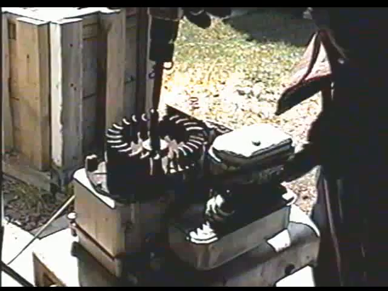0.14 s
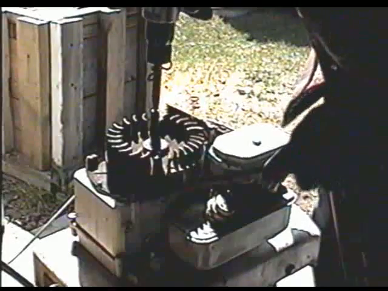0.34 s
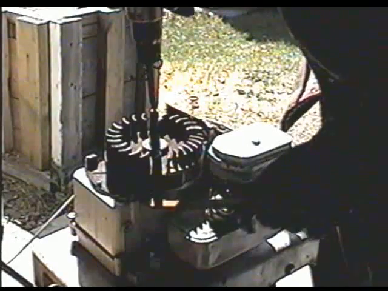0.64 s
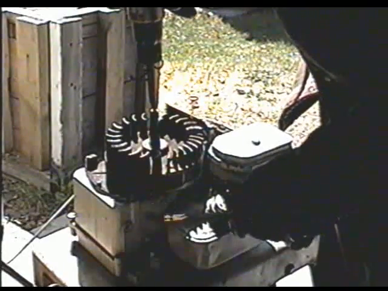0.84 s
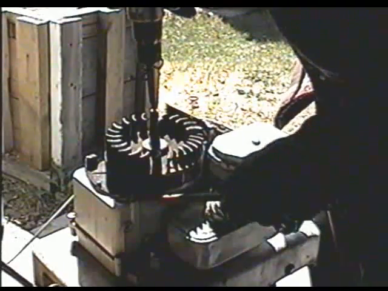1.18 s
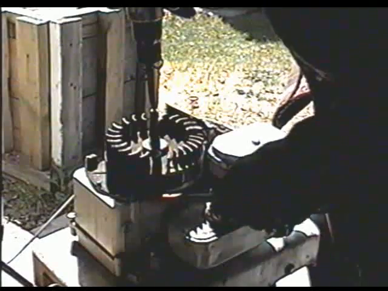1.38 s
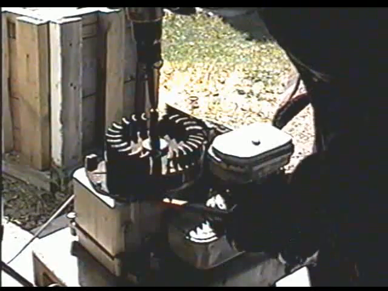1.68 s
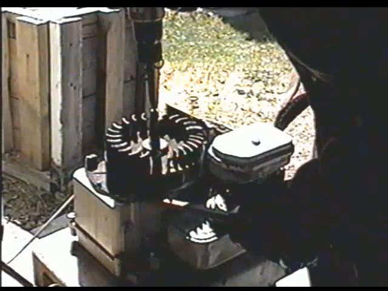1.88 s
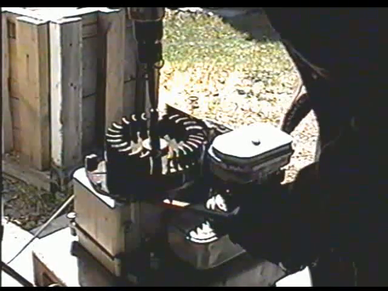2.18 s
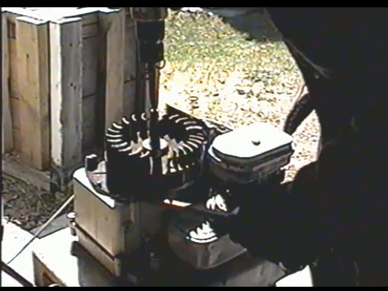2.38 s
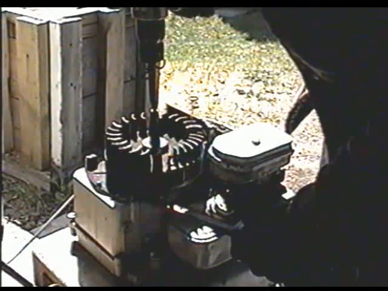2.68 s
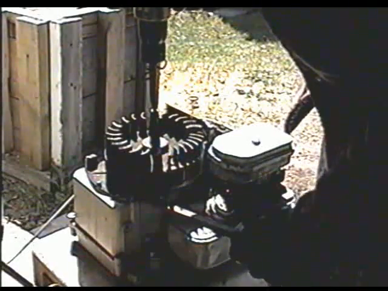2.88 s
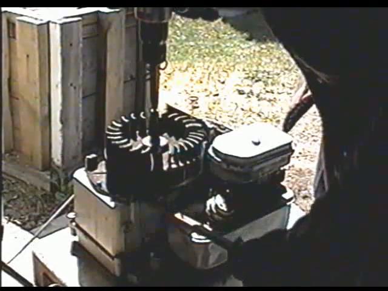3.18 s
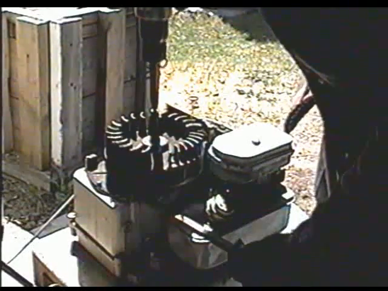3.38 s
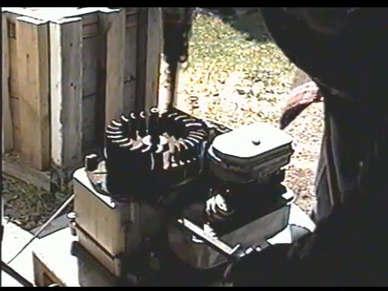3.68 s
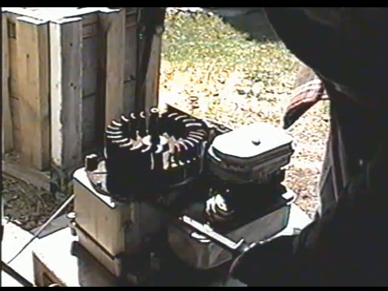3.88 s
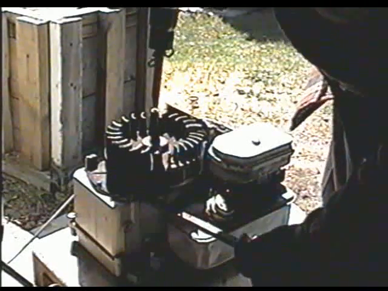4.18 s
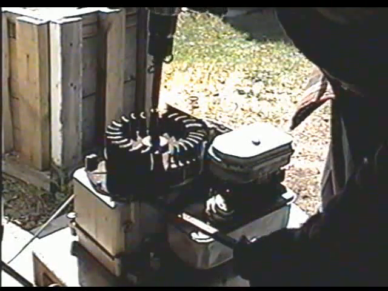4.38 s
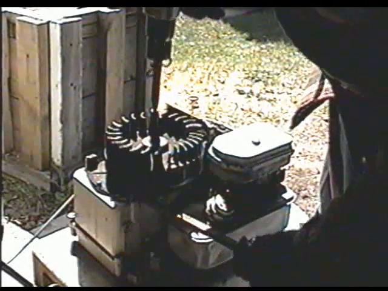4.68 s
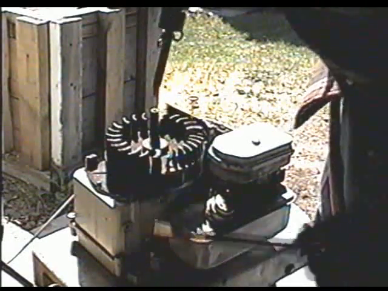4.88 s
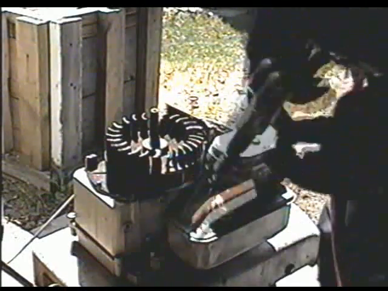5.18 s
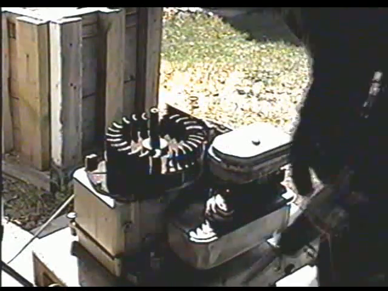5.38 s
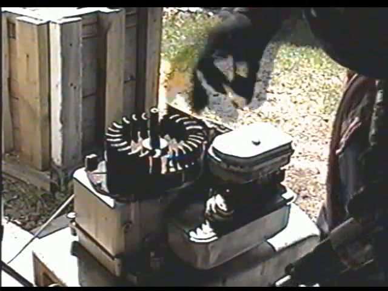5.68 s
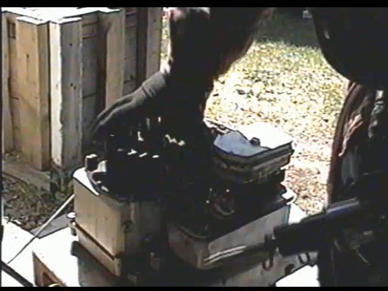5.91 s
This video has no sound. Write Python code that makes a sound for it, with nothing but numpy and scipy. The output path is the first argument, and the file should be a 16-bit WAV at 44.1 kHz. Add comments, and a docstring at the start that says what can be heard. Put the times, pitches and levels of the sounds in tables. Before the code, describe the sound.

A close camcorder microphone in a small yard picks up hiss, hum and motor whirr. A dull crate knock comes first, then pry bar clicks and one sharp snap. An air hammer fires three very short, fast metallic bursts with puffs of air. The whirr ducks under each burst and swells back. Light clinks of chisel, shaft and cover follow, with a short outdoor echo.

```python
"""In a yard, an air hammer fires three short bursts into a flywheel shaft; a pry bar, the chisel and a crate click around them.
Blows and knocks are short pushes of noise that ring each thing's own tones; the hammer's air is shaped noise.
A short noise tail gives the echo of the yard. A tape camcorder adds steady hiss, wavering hum, a low drone
and the whirr of its motor, which sinks under each burst and swells in the pauses; the sound drops out twice."""
import sys
import numpy as np
from scipy import signal
from scipy.fft import rfft, irfft
from scipy.io import wavfile
from scipy.ndimage import uniform_filter1d

SR = 44100
rng = np.random.default_rng(int(sys.argv[2]) if len(sys.argv) > 2 else 0)


def dump(signal):
    """Clip the signal to [-1, 1] and save it as 16-bit WAV at the path in sys.argv[1]."""
    limited = np.clip(np.atleast_2d(signal).T, -1, 1)
    pcm = np.round(limited * 32767).astype(np.int16)
    wavfile.write(sys.argv[1], SR, pcm)


def invert_db(level):
    """Linear amplitude ratio for a level in decibels (20 dB per decade), elementwise."""
    return 10 ** (np.asarray(level, dtype=float) / 20)


N = 266805
T = np.arange(N) / SR  # time of each sample [s]

# In every table of modes or colour the levels are relative: they set the balance, not the final loudness.
# steady firing: (first blow [s], trigger off [s], first rate [Hz], last rate [Hz],
#                 typical peak [dB], thump against peak [dB])
HAMMER_RUNS = [(2.4819, 2.589, 67.1, 75.7, -15.5, -8), (3.0613, 3.183, 70.77, 69, -15.5, -6),
               (3.4545, 3.49, 69.5, 68.5, -14.5, -8)]
# single blows as the piston starts, stumbles and coasts:
# (time [s], peak [dB], rattle of the steel [ms], thump against peak [dB])
SINGLE_BLOWS = [(2.4385, -14.5, 3, 4), (2.4643, -14.5, 4.5, -11.5), (3.047, -15, 2.1, -1),
                (3.2061, -25, 5, -5), (3.4393, -17, 7.4, -2.5), (3.497, -24, 9.6, 1),
                (3.5171, -21.5, 2.8, -4.5), (3.531, -20.5, 4.5, -1.5), (3.5492, -26, 3.6, 5),
                (3.5625, -19.5, 1.9, -2.5), (3.5775, -27.5, 2.9, 4), (3.6017, -30, 2.7, 3)]
# ringing tones of chisel and shaft: (pitch [Hz], width before damping [Hz], level [dB])
STEEL_MODES = [(2200, 61, -4), (2820, 52, -9), (3150, 38, -11), (3400, 9, -1), (3480, 50, 3), (3820, 60, 1),
               (4020, 130, 6.5), (6190, 88, 1), (6830, 82, -5), (7370, 150, 2), (8040, 80, -12),
               (8420, 110, 4), (8910, 63, -2), (9800, 190, -7.5)]
# broad sound of chisel and shaft: (frequency [Hz], level per Hz [dB])
STEEL_BODY = [(590, -44), (1000, 2.5), (1080, 2.5), (1790, 2.5), (2090, -4), (2440, -3), (4000, 2.5),
              (5620, -6), (6130, -4), (9210, -13), (13800, -11)]
# ringing tones of the engine block on its stand: (pitch [Hz], width before damping [Hz], level [dB])
BLOCK_MODES = [(279, 52, 3), (484, 20, -5), (849, 24, -0.5), (1094, 12, 2), (1422, 54, 0), (1720, 37, -22)]
# broad sound of the engine block: (frequency [Hz], level per Hz [dB])
BLOCK_BODY = [(29, -44), (50, -16), (173, -13.5), (274, -11), (486, -9), (564, -6.5), (835, -6.5),
              (1200, -16), (2500, -19), (3250, -11), (5500, -120)]
# exhaust air, one row a pull of the trigger:
# (open [s], shut [s], level at opening [dB], level at shutting [dB])
AIR_PULLS = [(2.417, 2.585, -42.5, -34.5), (3.035, 3.185, -30, -33.5), (3.4275, 3.575, -32.5, -40)]
# colour of the exhaust air: (frequency [Hz], level per Hz [dB])
AIR_COLOUR = [(1500, -7), (2500, -2), (3500, -1.5), (5200, -13), (7500, -4.5), (9500, -9.5), (12000, -20),
              (14000, -35)]
# whistle of the closing valve: (start [s], end [s], middle pitch [Hz], full level [dB])
VALVE_WHISTLE = (3.622, 3.684, 10050, -45.5)

# Knocks: each thing has a table of hits, then a pair of tables for its tones and its broad body.
# pry bar hits: (time [s], peak [dB], rattle [ms], tilt per octave [dB])
BAR_HITS = [(1.171, -24.5, 3.3, -1), (1.176, -24, 2.8, -2.5), (1.184, -32.5, 12, -7),
            (1.2423, -27.5, 10, -5.5), (1.6, -26.5, 11.6, -5)]
# pry bar: tones (pitch [Hz], width before damping [Hz], level [dB]); body (frequency [Hz], level per Hz [dB])
BAR = ([(450, 44, -20.5), (1120, 76, -34), (1880, 23, -44), (2150, 14, 2), (2910, 30, -22),
        (4200, 35, -17)], [(120, -48), (200, -29), (829, -22), (1170, -5), (1790, -21), (2160, -7),
        (2480, -12), (12000, -55), (15600, -78), (22000, -120)])
# sharp snaps: (time [s], peak [dB], rattle [ms], tilt per octave [dB])
SNAP_HITS = [(1.2565, -13, 4.9, -2.3), (1.263, -21.5, 5.3, -5), (3.6432, -29, 11.3, 9.5)]
# snap: tones (pitch [Hz], width before damping [Hz], level [dB]); body (frequency [Hz], level per Hz [dB])
SNAP = ([(2070, 45, -6.5), (2220, 45, -5), (2880, 23, -5), (4020, 40, 2), (5020, 50, -5), (5200, 27, -13),
         (6140, 100, -46), (7200, 50, -5), (6960, 19, -26)], [(120, -55), (200, -31), (1660, -27),
         (2150, -7.5), (2470, -15), (3960, -8), (4720, -9), (7310, -17), (13000, -86)])
# crate hits: (time [s], peak [dB], rattle [ms], tilt per octave [dB])
CRATE_HITS = [(.558, -30.5, 1.9, .1), (.563, -27, 1.7, -.1)]
# crate: tones (pitch [Hz], width before damping [Hz], level [dB]); body (frequency [Hz], level per Hz [dB])
CRATE = ([(196, 27, 4), (417, 24, 2), (1140, 60, -8), (1430, 90, -19), (1910, 75, -14), (3420, 80, -20),
         (4050, 100, -23)], [(59, -39), (150, 2), (368, 9), (886, -21), (1910, 0.5), (2340, -26),
         (3440, -13), (8000, -37), (10400, -65), (17600, -120)])
# flywheel hits: (time [s], peak [dB], rattle [ms], tilt per octave [dB])
FLYWHEEL_HITS = [(4.6437, -26, 5, 3.5), (4.648, -22, 11, -1.1), (4.663, -29.5, 9, -8)]
# flywheel: tones (pitch [Hz], width before damping [Hz], level [dB]); body (frequency [Hz], level per Hz [dB])
FLYWHEEL = ([(422, 18, -5), (689, 27, -22), (870, 33, -20), (2200, 86, -16), (2900, 37, -16),
             (3480, 30, -9), (4580, 88, -22), (5700, 76, -14), (7000, 31, -20), (8580, 42, -16)],
             [(47, -36), (100, -3), (446, 7.5), (1570, -4), (2150, -6.5), (3140, -30), (3410, -16),
             (5080, -23), (7100, -16), (12000, -35), (15600, -67), (22000, -120)])
# hits on the chisel collar, some at the start and end of a burst:
# (time [s], peak [dB], rattle [ms], tilt per octave [dB])
COLLAR_HITS = [(1.5413, -43, 3, 7), (2.418, -13.5, 3.7, 2.8), (2.4245, -20.5, 2.2, -7.5),
               (2.4352, -15.5, 2.5, -1), (2.608, -23, 4, 2.5), (3.261, -41, 4, 5), (3.6664, -46, 1.5, -8),
               (3.6824, -43, 1.5, 6), (4.503, -44.5, 6.9, -1), (4.5106, -28, 5, 1.5), (4.517, -37, 18, -1),
               (4.5234, -34, 5.7, 1), (4.854, -35.5, 4.4, -0.5)]
# chisel collar: tones (pitch [Hz], width before damping [Hz], level [dB]); body (frequency [Hz], level per Hz [dB])
COLLAR = ([(860, 18, 6), (2480, 40, 11), (4040, 92, -1.5), (6940, 27, 6), (7460, 31, -26), (8090, 34, -32),
           (9050, 53, -15), (10200, 46, -1)], [(120, -43), (200, 5), (883, 5.5), (1600, 7), (2520, -28),
           (3210, -10), (4180, -4), (5240, -13), (7830, 10.5), (13000, -25)])
# shaft hits: (time [s], peak [dB], rattle [ms], tilt per octave [dB])
SHAFT_HITS = [(4.396, -45.5, 6, -5), (4.801, -44.5, 40, 1), (4.830, -29.5, 5.2, 2.5),
              (4.837, -31.5, 9.1, -4.5), (5.614, -39, 2.4, 2.5), (5.631, -40, 14, 1)]
# shaft: tones (pitch [Hz], width before damping [Hz], level [dB]); body (frequency [Hz], level per Hz [dB])
SHAFT = ([(1510, 21, -2), (1850, 30, 2), (1950, 52, 1.5), (2720, 30, 2), (4000, 110, -11), (5550, 100, -23),
          (6500, 69, -14), (7900, 140, -14)], [(120, -45), (200, -14), (1170, -10), (1870, -5), (2310, -13),
          (2750, 4), (3450, -8), (8260, -18), (13000, -41)])
# cover hits: (time [s], peak [dB], rattle [ms], tilt per octave [dB])
COVER_HITS = [(4.457, -47.5, 7.5, -.1), (5.397, -20.5, 4, -.5), (5.402, -24, 4.9, -0.079),
              (5.651, -40, 15, -.1)]
# cover: tones (pitch [Hz], width before damping [Hz], level [dB]); body (frequency [Hz], level per Hz [dB])
COVER = ([(596, 58, -6), (1155, 55, -19), (1430, 43, -3), (1950, 59, -6), (2960, 67, -34), (3430, 64, -18)],
          [(120, -54), (200, -14), (580, -15), (966, -10), (1440, 1.5), (2890, -28), (4180, -30),
          (8000, -29), (10400, -57), (17600, -120)])
# chisel hits: (time [s], peak [dB], rattle [ms], tilt per octave [dB])
CHISEL_HITS = [(5.154, -46, 4, -5), (5.226, -43, 9, -5), (5.236, -27.5, 6.6, 1), (5.401, -33, 10, 11),
               (5.421, -30.5, 5.2, 9), (5.4394, -39.5, 4.9, -6.5)]
# chisel: tones (pitch [Hz], width before damping [Hz], level [dB]); body (frequency [Hz], level per Hz [dB])
CHISEL = ([(4320, 22, 9), (4450, 120, -6), (7080, 57, -15), (8700, 55, -6), (8540, 60, -3), (8950, 40, 4),
          (10170, 30, 6.5)], [(880, -49), (1500, -9), (2850, -5), (4280, 6.5), (4940, -15), (5510, -5.5),
          (8660, 5.5), (13000, -31)])

# how long the yard rings: (frequency [Hz], time to fall by 60 dB [s])
YARD_DECAY = [(100, 0.35), (400, 0.4), (1500, 0.39), (2800, 0.33), (3350, 0.41), (3900, 0.26), (7000, 0.24),
              (12000, 0.083)]
# colour of the motor whirr: (frequency [Hz], level per Hz [dB])
WHIRR_COLOUR = [(35, -31), (60, 6), (148, -16), (178, -23.5), (335, -4.5), (404, -5.5), (520, -4),
                (615, -5.5), (758, -1.5), (1200, -5), (1610, -7.5), (2450, -15), (9000, -27.5),
                (11700, -65), (19800, -120)]
# gear lines in the whirr: (pitch [Hz], level [dB])
WHIRR_LINES = [(764.4, -61.5), (855.9, -64.5), (1077, -63.5), (1437, -63), (1572, -72.5), (1620, -63.5),
               (1707, -67.5), (1798, -66.5), (2067, -73), (2336, -79), (2519, -85), (2772, -70),
               (4134, -79), (4317, -81), (4495, -70.5), (4673, -72), (5572, -81), (6654, -77)]
# colour of the low drone: (frequency [Hz], level per Hz [dB])
DRONE_COLOUR = [(70, -12), (130, -10), (185, 4.5), (300, -2), (450, -16), (900, -52)]
# colour of the tape hiss: (frequency [Hz], level per Hz [dB])
HISS_COLOUR = [(15, -10), (30, -13), (60, -11), (140, -17), (300, -27), (600, -24), (1500, -28),
               (3000, -27), (8000, -26), (12900, -27), (13100, -48), (13700, -50)]
# hum tones, about whose levels they waver: (pitch [Hz], level [dB])
HUM_LINES = [(31, -60.5), (177.6, -69), (538.3, -76), (1620, -85), (2277, -78.5), (2519, -80), (3235, -78),
             (3957, -81), (4134, -77), (4495, -83.5), (5216, -78), (6654, -79)]
# faint difference of right and left: (frequency [Hz], level against the common sound [dB])
MISMATCH = [(60, -47), (110, -44), (200, -50), (360, -48.5), (660, -44), (1210, -35.5), (2210, -35),
            (4030, -23), (7340, -28.5), (13400, -13.5)]
# silent gaps of the tape: (start [s], end [s])
DROPOUTS = [(.8848, .9194), (3.881, 3.917)]

STEP_S = 0.214  # whirr and drone suddenly drop here [s]
WHIRR_DB, WHIRR_BEFORE_STEP_DB = -43, -41.5  # full levels
DRONE_DB, DRONE_BEFORE_STEP_DB = -58.5, -50


def level(x, db):
    """Scale a sound to an average (rms) level in dB."""
    return x * invert_db(db) / np.sqrt(np.mean(x ** 2))


def shape(points, size):
    """Filter gain drawn through (Hz, dB) points, on a log frequency scale."""
    hz, db = np.transpose(points)
    f = np.fft.rfftfreq(size, 1 / SR)
    return invert_db(np.interp(np.log(f + 1), np.log(hz), db))


def noise(points):
    """Steady noise of a given colour, rms 1."""
    white = rng.standard_normal(N)
    return level(irfft(rfft(white) * shape(points, N), N), 0)


def walk(rate):
    """Smooth random drift with spread near 1: random steps at a rate in Hz, averaged twice."""
    k = int(SR / rate)
    steps = np.repeat(rng.standard_normal(N // k + 1), k)
    return 1.34 * uniform_filter1d(uniform_filter1d(steps, k), k)[:N]


def tones(lines, waver):
    """Steady sine tones whose phases wander a little."""
    total = np.zeros(N)
    for hz, db in lines:
        wander = waver * np.cumsum(walk(15)) / SR
        total += np.sqrt(2) * invert_db(db) * np.sin(2 * np.pi * hz * T + wander + 7 * rng.random())
    return total


def gate(start, end, edge_s):
    """1 between two times, with straight ramps at both ends."""
    return np.clip(np.minimum(T - start, end - T) / edge_s, 0, 1)


def strike(thing, hits, body_db, scatter_db, damp, tail_db, tail_ms,
           rise_ms=0.84, jolt=1.1, width=6, size=8192):
    """A contact, a dying rattle and a faint shudder ring a thing's tones and its broad body."""
    modes, body = thing
    f = np.fft.rfftfreq(size, 1 / SR)
    ms = 1000 * np.arange(size) / SR
    lead = 64  # samples of room ahead, as the body filter also acts a little early
    out = np.zeros(N + size)
    for s, db, rattle_ms, tilt_db in hits:
        fade = np.exp(-ms / max(rattle_ms, 0.3)) + invert_db(tail_db) * np.exp(-ms / tail_ms)
        push = rng.standard_normal(size) * fade * np.minimum(ms / rise_ms, 1)
        # the first touch is one clean shove, alike on every hit
        push[:int(width)] -= jolt * np.hanning(int(width))
        # each hit draws small random changes of every mode's level and pitch
        level_change, pitch_change = rng.standard_normal((2, len(modes)))
        ring = 0
        for g, e, (hz, mode_width, mode_db) in zip(level_change, pitch_change, modes):
            pitch = hz * (1 + 0.002 * e)
            loss = 1j * f * damp * mode_width
            ring = ring + invert_db(mode_db + scatter_db * g) * loss / (pitch ** 2 - f ** 2 + loss)
        # the far treble rolls off
        colour = (ring + invert_db(body_db) * shape(body, size)) / (1 + (f / 11000) ** 8)
        # a positive tilt makes the hit brighter, a negative one duller
        colour = colour * invert_db(tilt_db * np.log2(np.clip(f, 200, 10000) / 2500))
        sound = irfft(rfft(np.roll(push, lead)) * colour, size)
        # the strongest 6 ms lie about 8 dB under the peak
        strongest = np.sqrt(uniform_filter1d(sound ** 2, 260).max())
        at = int(s * SR) - lead
        out[at:at + size] += sound * invert_db(db - 8) / strongest
    return out[:N]


def hammer():
    """Steel on steel, the thump of the block under it, and the exhaust air."""
    s, db, rattle_ms, thump_db = blows().T
    no_tilt = 0 * s
    steel = strike((STEEL_MODES, STEEL_BODY), zip(s, db, rattle_ms, no_tilt), body_db=-1.5,
                   scatter_db=3.0, damp=3.4, tail_db=-20.5, tail_ms=14.5, rise_ms=1.6, jolt=0.3)
    # the block rattles longer than the steel and starts a touch earlier
    thumps = zip(s - 0.0004, db + thump_db, 1.44 * rattle_ms, no_tilt)
    block = strike((BLOCK_MODES, BLOCK_BODY), thumps, body_db=5.5, scatter_db=0.6, damp=1.15,
                   tail_db=-11, tail_ms=25.4, rise_ms=1.6, jolt=1.68, width=34)
    return steel + block + exhaust()


def blows():
    """Rows (s, peak dB, rattle ms, thump dB) of every piston blow; no two steady strokes are quite alike."""
    rows = list(SINGLE_BLOWS)
    for first, off, first_hz, last_hz, db, thump_db in HAMMER_RUNS:
        s = first
        while s < off:
            chance = rng.standard_normal(3)
            rows.append((s + 0.0004 * chance[0], db + 0.8 * chance[1], 4.5, thump_db + 0.81 * chance[2]))
            rate = first_hz + (s - first) / (off - first) * (last_hz - first_hz)
            s += 1 / rate
    return np.array(rows)


def exhaust():
    """Air rushes out while the trigger is held and bleeds away; the last closing of the valve whistles."""
    rise_s, fall_db_per_s = 0.003, 700
    flow = np.zeros(N)
    for on, off, open_db, shut_db in AIR_PULLS:
        held_db = np.interp(T, [on, off], [open_db, shut_db])
        bleed_db = fall_db_per_s * np.maximum(T - off, 0)
        flow += gate(on, T[-1] + 1, rise_s) * invert_db(held_db - bleed_db)
    air = noise(AIR_COLOUR) * invert_db(2.6 * walk(150)) * flow
    start, end, hz, db = VALVE_WHISTLE
    # the whistle swells by 6 dB over its first half
    swell_db = -6 * (1 - np.clip(2 * (T - start) / (end - start), 0, 1))
    tone = np.sin(2 * np.pi * np.cumsum(hz + 80 * walk(400)) / SR)
    loudness = invert_db(db + swell_db + 2.0 * walk(150)) * gate(start, end, edge_s=0.007)
    return air + np.sqrt(2) * loudness * tone


def knocks():
    """Tools shifting and touching the engine: each touch rings the thing that is hit."""
    # (thing, hits, body [dB], damping factor, shudder [dB], shudder [ms])
    things = [(BAR, BAR_HITS, -8, 1.6, -22, 25), (SNAP, SNAP_HITS, -0.5, 4.5, -15, 26),
              (CRATE, CRATE_HITS, -6, 1.6, -13, 45), (FLYWHEEL, FLYWHEEL_HITS, -2, 2.5, -10, 36),
              (COLLAR, COLLAR_HITS, -2, 3.1, -18, 18), (SHAFT, SHAFT_HITS, -7, 1.6, -18, 22),
              (COVER, COVER_HITS, -1.5, 2.5, -24, 15), (CHISEL, CHISEL_HITS, -4, 2.5, -18, 22)]
    return sum(strike(thing, hits, body_db, 1.2, damp, tail_db, tail_ms)
               for thing, hits, body_db, damp, tail_db, tail_ms in things)


def yard(x, size=32768):
    """Walls and crates return a short diffuse tail: noise that dies away band by band."""
    t = np.arange(size) / SR
    f = np.log(np.fft.rfftfreq(size, 1 / SR) + 1)
    centres = np.log(np.array(YARD_DECAY)[:, 0])
    tail = 0
    for k, (hz, t60) in enumerate(YARD_DECAY):
        # each band fades into its neighbours
        weight = np.interp(f, centres, np.arange(len(centres)) == k)
        band = irfft(rfft(rng.standard_normal(size)) * np.sqrt(weight), size)
        tail = tail + band * np.exp(-np.log(1000) * t / t60)
    # silent for 3 ms, then the tail fades in
    tail = tail * np.clip((t - 0.003) / 0.0044, 0, 1)
    tail = invert_db(-13.5) * tail / np.sqrt(np.sum(tail ** 2))
    return signal.fftconvolve(x, tail)[:N]


def sink():
    """How far (dB) the motor sound lies under its full level; the climb back rounds off near the top."""
    step_sink_db, burst_sink_db, climb_db_per_s = 17.5, 34.5, 12
    dips = [(STEP_S, STEP_S, step_sink_db)]
    dips += [(on, off, burst_sink_db) for on, off, *_ in AIR_PULLS]
    depths = [np.where(T < on, -99, db - climb_db_per_s * np.maximum(T - off, 0)) for on, off, db in dips]
    deepest_db = np.max(depths, axis=0)
    return 10 * np.log10(1 + invert_db(deepest_db) ** 2)


def camcorder():
    """Motor whirr with gear lines and a low drone that sink and climb, over steady tape hiss and wavering hum."""
    rush = level(noise(WHIRR_COLOUR), -49.5) * invert_db(0.78 * walk(10))
    whirr = level(rush + invert_db(-0.5) * tones(WHIRR_LINES, waver=12), 0)
    whirr = whirr * invert_db(np.where(T < STEP_S, WHIRR_BEFORE_STEP_DB, WHIRR_DB - sink()))
    # the drone sinks half as far in dB
    drone_db = np.where(T < STEP_S, DRONE_BEFORE_STEP_DB, DRONE_DB - 0.5 * sink())
    drone = noise(DRONE_COLOUR) * invert_db(drone_db + 0.97 * walk(16))
    hiss = level(noise(HISS_COLOUR), -57)
    hum = tones(HUM_LINES, waver=15.8) * invert_db(1.25 * walk(5))
    return whirr + drone + hiss + hum


def scene():
    """One microphone, the same on both channels."""
    blasts, clicks = hammer(), knocks()
    # the knocks face the microphone and wake the yard less
    echo = yard(blasts + invert_db(-3) * clicks)
    return np.tile(blasts + clicks + echo + camcorder(), (2, 1))


def band_limit(x):
    """A steep low-pass at the top of the band."""
    return signal.sosfilt(signal.butter(12, 13990, fs=SR, output="sos"), x)


def record(dry):
    """The loudest peaks are rounded, the channels differ a little, the top is cut and the tape drops out twice."""
    soft = np.tanh(2.465 * dry) / 2.57
    side = irfft(rfft(soft[0] * walk(300)) * shape(MISMATCH, N), N)
    pair = soft + side * np.array([[1], [-1]])
    # steep low-pass at 13.7 kHz
    low_pass = signal.ellip(12, 0.2, 90, 13700, fs=SR, output="sos")
    mix = signal.sosfilt(low_pass, pair)
    for start, end in DROPOUTS:
        mix[:, int(start * SR):int(end * SR)] = 0
    return band_limit(mix)


dry = scene()
out = record(dry)
dump(out)
```